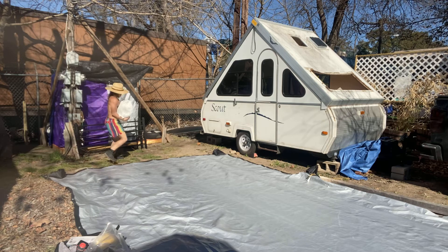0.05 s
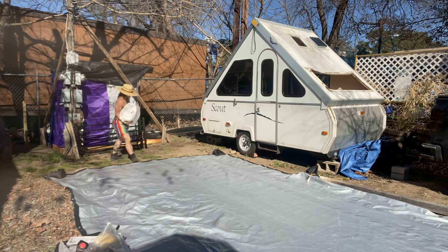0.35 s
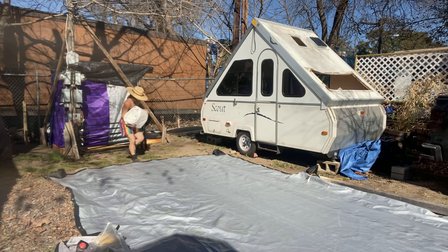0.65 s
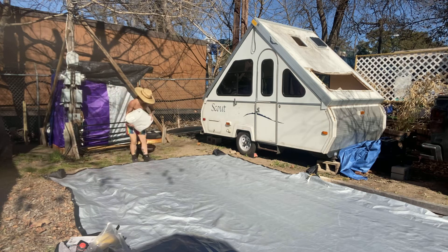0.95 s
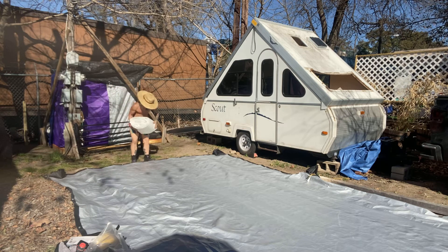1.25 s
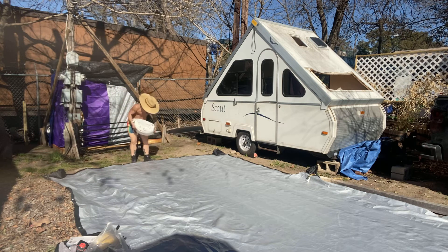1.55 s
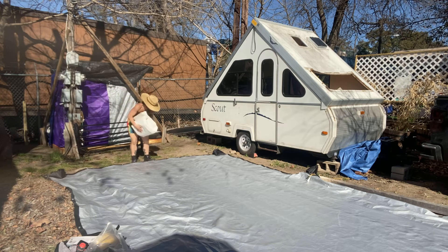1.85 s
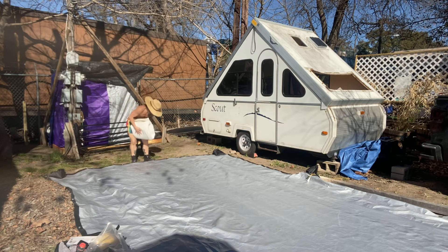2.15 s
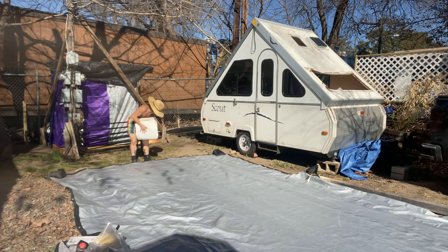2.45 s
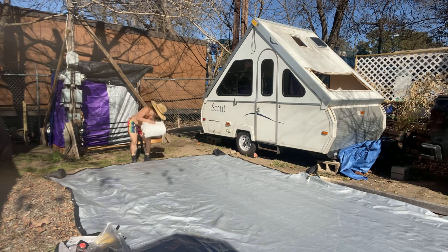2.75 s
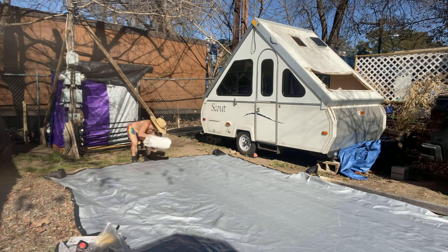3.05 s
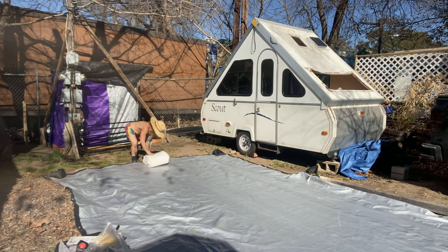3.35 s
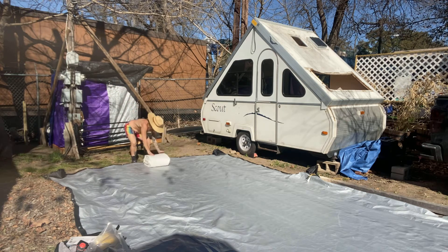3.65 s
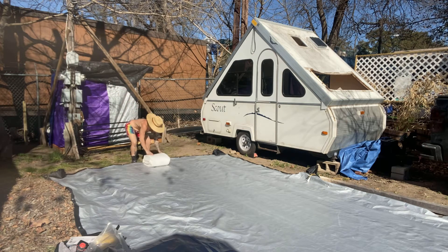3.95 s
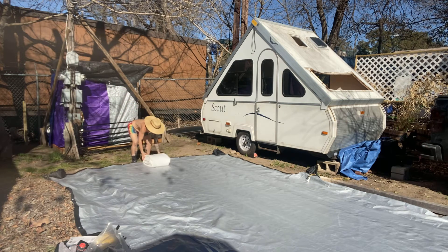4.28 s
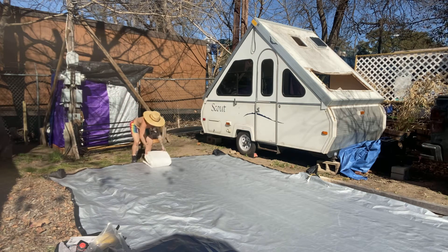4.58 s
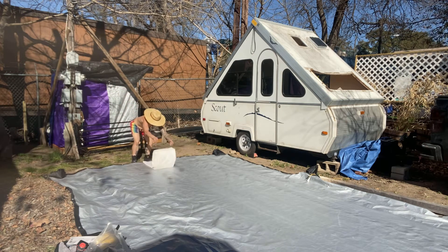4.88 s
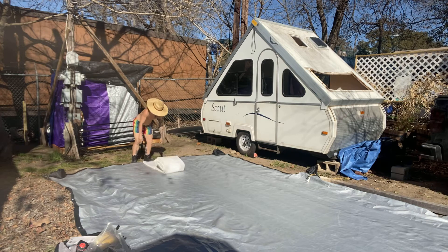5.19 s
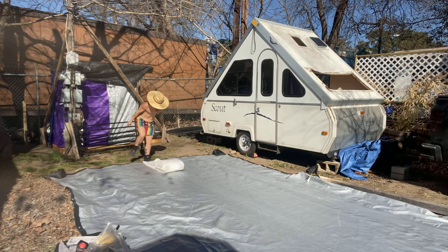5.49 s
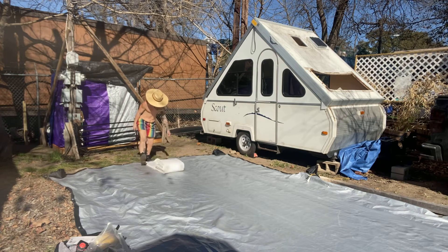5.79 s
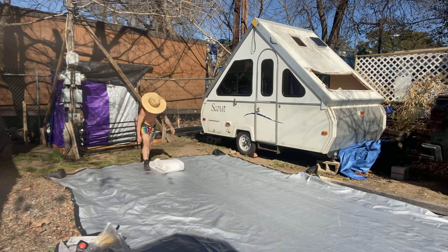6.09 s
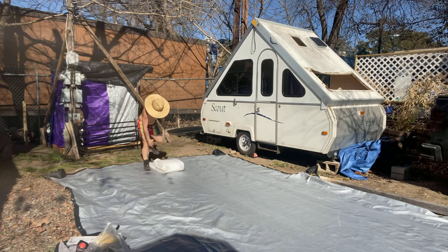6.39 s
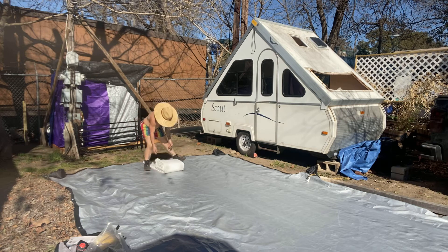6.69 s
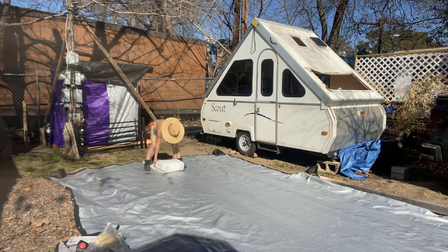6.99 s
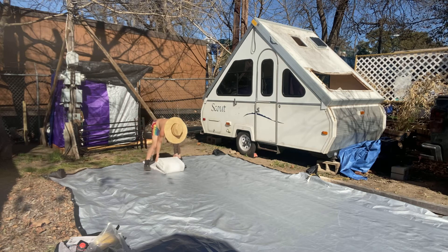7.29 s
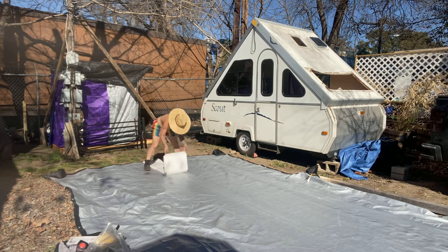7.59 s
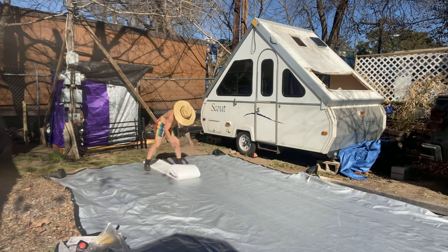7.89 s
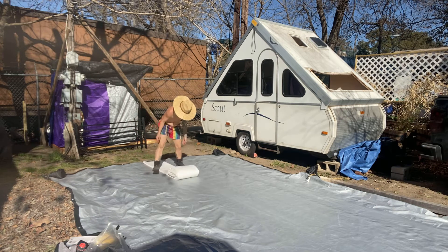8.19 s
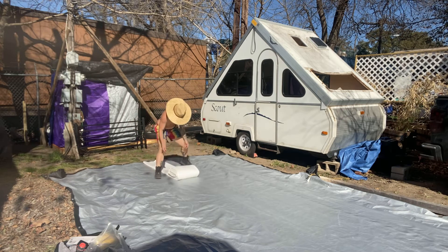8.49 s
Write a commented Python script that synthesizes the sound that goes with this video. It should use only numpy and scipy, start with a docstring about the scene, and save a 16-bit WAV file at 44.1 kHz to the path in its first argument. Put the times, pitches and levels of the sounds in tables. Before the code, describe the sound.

A folded rubber sheet slaps down on a plastic tarp outdoors, then rustles and thuds as it is unfolded, over faint distant traffic.

```python
"""Distant traffic hums and a small bird chips briefly, some way off in a back yard.
A folded rubber sheet is carried, dropped with a slap on a plastic tarp and unfolded, some metres away.
Flat faces smack and squeeze out air, the heavy folds thud on the ground, creases crackle as they slide.
A brick wall and a camper throw the sound back; nearby, the tarp ticks."""
import sys
import numpy as np
from scipy import signal
from scipy.fft import rfft, irfft
from scipy.io import wavfile
from scipy.ndimage import uniform_filter1d

SR = 44100
rng = np.random.default_rng(int(sys.argv[2]) if len(sys.argv) > 2 else 0)


def unload_audio(sound):
    """Save the sound as a 16-bit wav file, at the path given as the first command line argument."""
    columns = np.transpose(np.atleast_2d(sound))
    # keep every value between -1 and 1, then stretch to whole-number steps
    steps = np.round(np.clip(columns, -1, 1) * 32767)
    wavfile.write(sys.argv[1], SR, steps.astype(np.int16))


N = 376432
TIME_S = np.arange(N) / SR


def undb(db):
    """Decibels to gain."""
    return 10 ** (np.asarray(db) / 20)


def unit(x):
    """Scale to rms 1."""
    return x / np.sqrt(np.mean(x ** 2) + 1e-20)


def add(out, start_s, x):
    """Mix x into out from start_s."""
    i = max(int(start_s * SR), 0)
    out[i:i + len(x)] += x[:max(N - i, 0)]


def colour(x, points, tilt_db_per_oct=0):
    """Shape by (Hz, dB) points and a tilt; rms 1."""
    octave = np.log2(np.maximum(np.fft.rfftfreq(len(x), 1 / SR), 1))
    hz, db = np.transpose(points)
    gain = undb(np.interp(octave, np.log2(hz), db) + tilt_db_per_oct * octave)
    return unit(irfft(rfft(x) * gain, len(x)))


def resonate(x, hz, width_hz, passes=1):
    """One resonance, narrower with each pass; rms 1."""
    b, a = signal.iirpeak(hz, hz / width_hz, SR)
    for _ in range(passes):
        x = unit(signal.lfilter(b, a, x))
    return x


def walk(rate_hz):
    """Smooth random drift with a spread near 1."""
    return np.interp(TIME_S * rate_hz, np.arange(1024), rng.standard_normal(1024))


def crackle(size, per_s, spread_db):
    """Tiny random clicks, a few much larger than the rest; rms 1."""
    hit = rng.random(size) < per_s / SR
    strength = undb(spread_db * np.minimum(rng.exponential(size=size), 5))
    return unit(hit * strength * rng.standard_normal(size))


# Traffic spectrum. Each row: frequency in Hz, relative level in dB.
TRAFFIC_COLOUR = [(25, -40), (40, -11.5), (52, -8), (66, 1), (100, -4), (150, -8), (220, -10.5),
                  (400, -13.5), (700, -17), (1300, -20.5), (2600, -28), (5000, -35.5), (9000, -44),
                  (15500, -50.5)]
# Distant machinery. Each row: frequency in Hz, filter width in Hz, level in dB.
MACHINE_TONES = [(59, 13, -60.5), (1383, 66, -71.5), (2523, 89, -71.5)]


def town(traffic_db=-51):
    """Far traffic swelling slightly, with faint machine tones."""
    traffic = colour(rng.standard_normal(N), TRAFFIC_COLOUR) * undb(traffic_db + 0.68 * walk(3.13))
    machines = sum(undb(db) * resonate(rng.standard_normal(N), hz, width_hz, passes=2)
                   for hz, width_hz, db in MACHINE_TONES)
    return traffic + machines


# Bird notes. Each row: centre in seconds, pitch in Hz, level in dB, half length in seconds.
BIRD_CHIPS = [(0.653, 2832, -65, 0.051), (1.23, 3706, -50.5, 0.011), (1.254, 4490, -53.5, 0.0099),
              (1.27, 3700, -52.5, 0.016), (1.276, 3340, -52, 0.0074)]


def bird():
    """A faint note and a few raspy chips, scattered by the trees; the louder ones gain an octave."""
    direct = np.zeros(N)
    t = np.arange(SR // 4) / SR - 1 / 8
    for centre_s, hz, db, half_s in BIRD_CHIPS:
        rasp = unit(uniform_filter1d(rng.standard_normal(len(t)), size=24))
        phase = 2 * np.pi * np.cumsum(hz * (1 + 0.036 * rasp)) / SR
        tone = np.sin(phase) + undb(db + 43) * np.sin(2 * phase)
        add(direct, centre_s + t[0], undb(db) * np.exp(-(t / half_s) ** 2) * tone)
    t = np.arange(SR // 2) / SR
    trees = unit(rng.standard_normal(len(t)) * np.exp(-t / 0.064)) / np.sqrt(len(t))
    scattered = undb(1) * signal.fftconvolve(direct, trees)[:N]
    return signal.sosfilt(signal.butter(8, 8000, fs=SR, output="sos"), direct + scattered)


# Wall reflections. Each row: delay in seconds, gain in dB.
WALL_ECHOES = [(.0075, -16.5), (.028, -17), (.054, -30)]


def yard(x, build_s=0.015, rt60_s=0.37):
    """A few wall echoes; fences and trees scatter each band into a thin, diffuse tail."""
    t = np.arange(SR) / SR
    fade = (1 - np.exp(-t / build_s)) * undb(-60 * t / rt60_s) ** 2
    tail = np.zeros(N)
    for low_hz, high_hz, db in [(100, 318, -12), (592, 1650, -11.5),
                                (2000, 5700, -14.5), (5000, 13000, -20.5)]:
        band = signal.butter(3, [low_hz, high_hz], "band", fs=SR, output="sos")
        power = signal.fftconvolve(signal.sosfilt(band, x) ** 2, fade / fade.sum())[:N]
        noise = unit(signal.sosfilt(band, rng.standard_normal(N)))
        tail += undb(db) * np.sqrt(np.abs(power)) * noise
    walls = sum(undb(db) * np.interp(TIME_S - delay_s, TIME_S, x) for delay_s, db in WALL_ECHOES)
    return x + walls + tail


# Tarp ticks. Each row: start in seconds, peak before the high-pass in dB, pitch in Hz.
TARP_TICKS = [(2.497, -57, 10000), (5.877, -43, 8000), (5.889, -55, 11000), (5.966, -41, 7000),
              (5.970, -45, 10000), (6.219, -52, 12000), (6.315, -51, 11000), (6.475, -44, 11000),
              (6.482, -46, 11000), (6.558, -38, 11000), (6.70, -45, 7900), (7.4506, -37, 9000),
              (8.234, -36, 5500), (8.2594, -33, 8000)]


def ticks():
    """The stretched tarp ticks nearby, dry and sharp."""
    out = np.zeros(N)
    t = np.arange(SR // 20) / SR
    envelope = np.exp(-t / 0.00042) + undb(-21) * np.exp(-t / 0.011)
    for start_s, db, hz in TARP_TICKS:
        click = resonate(rng.standard_normal(len(t)), hz, hz * 0.85) * envelope
        add(out, start_s, undb(db) * click / np.abs(click).max())
    return signal.sosfilt(signal.butter(2, 3000, "high", fs=SR, output="sos"), out)


# Rubber dragged over a hollow fold.
# Each row: centre in seconds, level in dB, resonance in Hz, half length in seconds.
FOLD_SCUFFS = [(0.803, -55, 1000, 0.014), (1.183, -60, 1770, 0.052), (2.783, -60.5, 3920, 0.042),
               (3.861, -57, 820, 0.039), (4.413, -51.5, 2380, 0.038), (4.536, -46, 1340, 0.013),
               (4.589, -51.5, 2360, 0.11), (4.706, -45, 1340, 0.017), (4.976, -44, 1300, 0.033),
               (5.263, -52, 1880, 0.033), (5.424, -62.5, 3050, .08), (5.627, -51, 910, .009),
               (5.874, -59.5, 1460, 0.077), (7.208, -51, 2480, 0.038), (7.368, -47.5, 1500, 0.009),
               (7.652, -48, 1160, 0.061), (7.722, -48, 1050, 0.028), (7.846, -41, 1730, 0.033),
               (8.167, -58, 1010, 0.037)]


def scuffs():
    """Fast stick and slip rings the air pocket in a fold."""
    out = np.zeros(N)
    t = np.arange(SR // 2) / SR - 1 / 4
    for centre_s, db, hz, half_s in FOLD_SCUFFS:
        slips = crackle(len(t), per_s=1500, spread_db=1.6)
        pocket = resonate(slips, hz, hz * 0.39, passes=2)
        add(out, centre_s + t[0], undb(db) * np.exp(-(t / half_s) ** 2) * pocket)
    return out


def stroke(start_s, end_s, attack_s, release_s=0.028):
    """A movement gets going, holds, and dies away once the hand stops."""
    attack = np.clip((TIME_S - start_s) / attack_s, 0, 1)
    return attack * np.exp(-np.clip((TIME_S - end_s) / release_s, 0, 20))


# Spectra of rubbing rubber and crinkling tarp. Each row: frequency in Hz, relative level in dB.
RUB_COLOUR = [(120, -12.5), (300, -0.5), (700, -1), (1300, -1.5), (2200, -7), (3500, -10.5), (6000, -20.5),
              (15000, -47)]
CRINKLE_COLOUR = [(1000, -15), (3000, 0), (5000, -0.5), (7500, -1), (8800, -8.5), (12500, -7),
                  (15500, -14.5)]
# Sheet, hands or feet brushing the tarp.
# Each row: start in seconds, length in seconds, relative rub and crinkle levels in dB.
SHORT_STROKES = [(0.875, 0.044, -60, -60), (1.617, .06, -54, -63), (1.898, 0.17, -58, -64.5),
                 (2.08, 0.11, -60.5, -66), (2.729, .07, -50.5, -62.5), (2.918, 0.23, -58, -63.5),
                 (3.298, 0.11, -49, -55.5), (3.387, .1, -52, -60.5), (3.538, .055, -60, -63.5),
                 (3.723, 0.23, -54.5, -59), (3.956, 0.16, -75, -66), (5.066, 0.068, -38, -48.5),
                 (5.226, 0.057, -52, -62), (5.238, 0.33, -54.5, -66), (5.43, 0.056, -49.5, -62),
                 (5.591, 0.14, -59.5, -61), (5.847, 0.16, -66, -65.5), (5.995, 0.055, -55.5, -63),
                 (7.135, 0.1, -51, -59.5), (7.235, 0.082, -53, -65), (7.329, 0.047, -44.5, -58),
                 (7.374, 0.14, -48, -59.5), (7.434, .026, -52, -54), (7.497, .018, -47, -59),
                 (7.815, 0.089, -44, -43), (7.91, 0.25, -59.5, -64.5), (8.108, 0.084, -48.5, -64),
                 (8.216, 0.14, -57, -60.5), (8.337, .2, -63, -64.5)]
# Folds dragged open in two pulls; the first eases off briefly near 4.75 s and goes on in a second curve. Each
# row: time in seconds, relative rub and crinkle levels in dB.
LONG_PULLS = [
    [(4.36, -68, -71), (4.388, -53, -56), (4.614, -45, -46), (4.628, -48, -52.5), (4.718, -43.5, -57.5),
     (4.725, -45, -57)],
    [(4.76, -45, -59), (4.866, -45, -52.5), (4.906, -50.5, -65), (4.976, -46, -55.5), (5.034, -44.5, -51),
     (5.04, -40, -61)],
    [(7.54, -50, -65), (7.6, -48, -58.5), (7.67, -48, -67), (7.684, -49, -56), (7.71, -47, -55),
     (7.77, -46, -51.5)],
]


def sliding():
    """Rubber catches and slips in uneven spurts while the tarp crinkles under it."""
    rub_power, crinkle_power = np.zeros(N), np.zeros(N)
    for start_s, length_s, rub_db, crinkle_db in SHORT_STROKES:
        motion = stroke(start_s, start_s + length_s, attack_s=0.46 * length_s)
        rub_power += (motion * undb(rub_db)) ** 2
        crinkle_power += (motion * undb(crinkle_db)) ** 2
    for pull in LONG_PULLS:
        times_s, rub_db, crinkle_db = np.transpose(pull)
        motion = stroke(times_s[0], times_s[-1], attack_s=0.02)
        rub_power += (motion * undb(np.interp(TIME_S, times_s, rub_db) + 0.5)) ** 2
        crinkle_power += (motion * undb(np.interp(TIME_S, times_s, crinkle_db))) ** 2
    grip = undb(1.6 * walk(55))
    rub = np.sqrt(rub_power) * colour(crackle(N, per_s=4500, spread_db=1.6), RUB_COLOUR)
    crinkle = np.sqrt(crinkle_power) * colour(crackle(N, per_s=6500, spread_db=2.5), CRINKLE_COLOUR)
    return grip * (undb(-1.5) * rub + undb(-0.5) * crinkle)


# Single creases. Each row: start in seconds, relative level in dB, pitch in Hz, decay in seconds.
CREASE_SNAPS = [(.92, -58, 7000, 0.012), (1.591, -38, 4670, 0.0042), (3.402, -46, 4000, 0.0043),
                (3.557, -51, 4000, .003), (3.852, -34, 815, 0.0031), (4.05, -52, 6900, .004),
                (4.469, -44, 5500, 0.013), (4.594, -41, 5000, 0.021), (4.763, -37.5, 1380, 0.012),
                (4.831, -45, 5000, .012), (4.967, -36, 1460, 0.0051), (5.458, -48, 4000, .008),
                (5.693, -53, 5000, .003), (5.772, -52, 5000, .003), (7.2, -47, 6000, .006),
                (7.442, -36, 1510, 0.0081), (7.5094, -48, 8000, .005)]


def snaps(gain_db=-3.5):
    """A crease flips over: a quick cluster of clicks in one broad resonance."""
    out = np.zeros(N)
    t = np.arange(SR // 4) / SR
    for start_s, db, hz, decay_s in CREASE_SNAPS:
        clicks = crackle(len(t), per_s=9000, spread_db=0.98)
        crease = resonate(clicks, hz, hz * 0.56, passes=2)
        add(out, start_s, undb(db + gain_db) * np.exp(-t / decay_s) * crease)
    return out


def thud(db, hz, decay_s):
    """Limp rubber on soil: a soft push that dies in a few cycles, with a flutter of loose layers."""
    t = np.arange(SR // 4) / SR
    flutter = resonate(rng.standard_normal(len(t)), hz, hz * 0.45)
    push = t / decay_s * np.exp(1 - t / decay_s)
    return undb(db) * push ** 2 * (np.sin(2 * np.pi * hz * t) + 0.31 * flutter)


# Feet and single folds landing. Each row: start in seconds, level in dB, pitch in Hz, decay in seconds.
SINGLE_THUDS = [(1.767, -40, 205, 0.0056), (2.722, -47, 90, 0.013), (2.861, -42, 103, 0.0087),
                (3.0, -43.5, 110, 0.01), (3.292, -37, 85, 0.01), (5.245, -39, 79, 0.0084),
                (6.053, -33.5, 82.5, 0.0066), (6.507, -36, 99, .007)]


def thuds():
    """Each step or single fold hits the ground once."""
    out = np.zeros(N)
    for start_s, db, hz, decay_s in SINGLE_THUDS:
        add(out, start_s, thud(db, hz, decay_s))
    return out


# The whole weight coming down.
# Each row: start in seconds, face, body and ground levels in dB, loss per layer in dB.
SHEET_LANDINGS = [(3.167, -19.5, -29, -25.5, 11.5), (5.06, -40, -40, -40, 2), (6.367, -30.5, -22, -28, 3.5),
                  (7.808, -51, -45, -40, 7)]
# Face, body and ground giving way.
# Each row: pitch in Hz, lag in seconds, decay in seconds, extra loss per layer in dB.
LANDING_PARTS = [(431, 0.0013, 0.0057, -1.5), (167, .011, 0.0079, 4), (80.4, .022, 0.009, 1.5)]


def landings(layers=4, gap_s=0.037, jitter_s=0.004, detune_oct=0.17):
    """Face, body and ground thud in turn; loose layers follow, weaker and a little off time and pitch."""
    out = np.zeros(N)
    for start_s, *levels_db, loss_db in SHEET_LANDINGS:
        for db, (hz, lag_s, decay_s, extra_loss_db) in zip(levels_db, LANDING_PARTS):
            for layer in range(layers):
                late, detune = rng.standard_normal(2) * (layer > 0)
                layer_s = start_s + lag_s + layer * gap_s + late * jitter_s
                layer_db = db - layer * (loss_db + extra_loss_db)
                layer_hz = hz * 2 ** (detune * detune_oct)
                add(out, layer_s, thud(layer_db, layer_hz, decay_s))
    return out


# Slap spectrum. Each row: frequency in Hz, relative level in dB.
SLAP_COLOUR = [(70, -57), (170, -22.5), (280, -10.5), (420, -7), (620, -5.5), (950, -5.5), (1300, -5.5),
               (1750, -5), (3000, -7.5), (5400, -10), (7400, -12.5), (9000, -19.5), (12800, -18),
               (15500, -25.5)]
# Flat faces meeting, rubber or soles. Each row: impact in seconds, level in dB, rise and decay
# in seconds, tilt in dB per octave, air pop level in dB, pop pitch in Hz.
FACE_SLAPS = [(.848, -50, .0007, 0.02, -1, -37, 1690), (1.016, -52.5, .003, 0.022, -3, -43, 1000),
              (1.591, -50, .0005, 0.029, -3, -44, 3000), (1.7673, -34.5, 0.0096, 0.015, -1.5, -18.5, 3200),
              (3.17, -12.5, 0.0047, 0.014, -1, -1.5, 1600), (5.06, -34, 0.01, 0.018, -0.9, -38, 3500),
              (5.098, -38.5, 0.015, 0.026, -4.5, -44, 1500), (6.374, -39, 0.006, 0.088, -4.5, -59, 1500),
              (7.501, -39, 0.00058, 0.012, -4, -31, 905), (7.791, -34, 0.0056, 0.076, -1.9, -44, 2000),
              (7.8145, -35, 0.0077, 0.03, -6.5, -22, 1070)]


def slaps(lead_s=0.1):
    """Contact spreads over the face in many small smacks; trapped air pops out; the wrinkles settle."""
    out = np.zeros(N)
    t = np.arange(SR // 2) / SR - lead_s
    after_s = np.maximum(t, 0)
    for impact_s, db, rise_s, decay_s, tilt_db_per_oct, pop_db, pop_hz in FACE_SLAPS:
        grains = crackle(len(t), per_s=18000, spread_db=1.1)
        spray = crackle(len(t), per_s=25000, spread_db=0.8)
        contact = np.exp(np.minimum(t, 0) / rise_s - after_s / decay_s)
        smacks = colour(grains, SLAP_COLOUR, tilt_db_per_oct) * contact
        cycles = after_s * pop_hz
        pop = np.sin(2 * np.pi * cycles) * 2 * np.sqrt(cycles) * np.exp(-cycles / 1.03)
        ground_echo = 0.24 * np.interp(t - 0.00078, t, pop)
        # Air spitting from the closing gap gives the bright edge.
        spit = colour(spray, SLAP_COLOUR, tilt_db_per_oct=2.3) * np.exp(-((t - 0.0015) / 0.00054) ** 2)
        air = pop + ground_echo + undb(-10) * spit
        add(out, impact_s - lead_s, undb(db) * smacks + undb(pop_db) * air)
    return out


def scene():
    """The sheet echoing in the yard, with dry tarp ticks, bird and town; one channel."""
    sheet = slaps() + thuds() + landings() + snaps() + sliding() + scuffs()
    return (yard(sheet) + ticks() + bird() + town())[None]


def record(dry, low_hz=38, top_hz=15850):
    """Round the highest peak, drop the deepest bass and cut the top."""
    rounded = np.tanh(0.83 * dry) / 0.77
    thin = signal.sosfilt(signal.butter(4, low_hz, "high", fs=SR, output="sos"), rounded)
    return signal.sosfilt(signal.ellip(10, 0.1, 70, top_hz, fs=SR, output="sos"), thin)


dry = scene()
out = record(dry)
unload_audio(out)
```